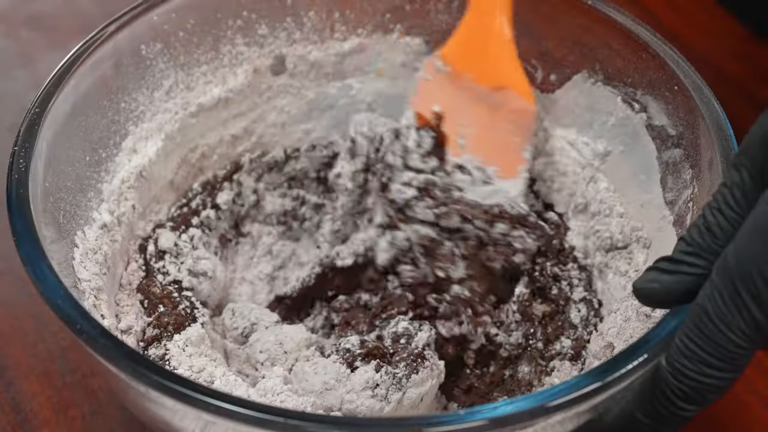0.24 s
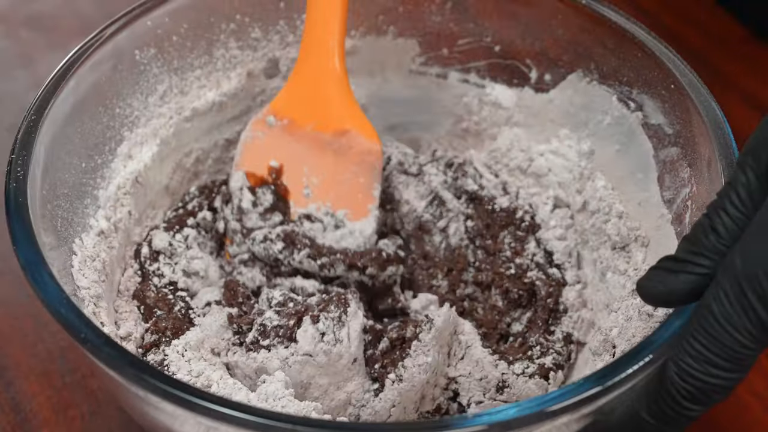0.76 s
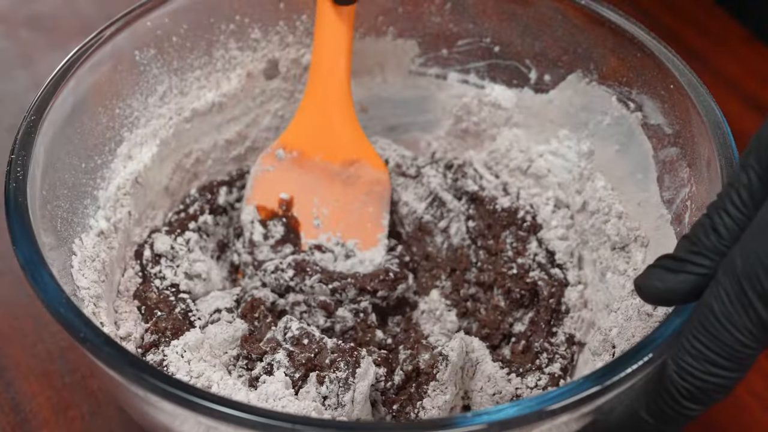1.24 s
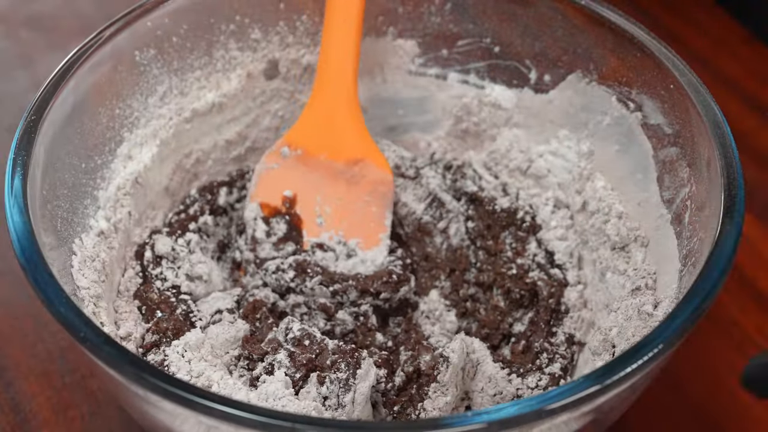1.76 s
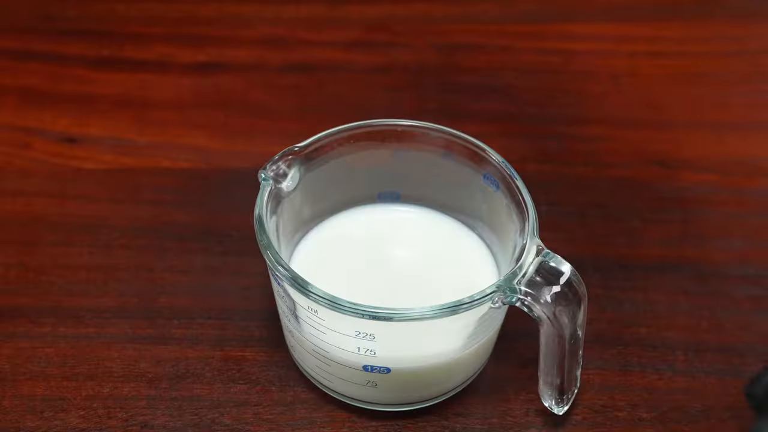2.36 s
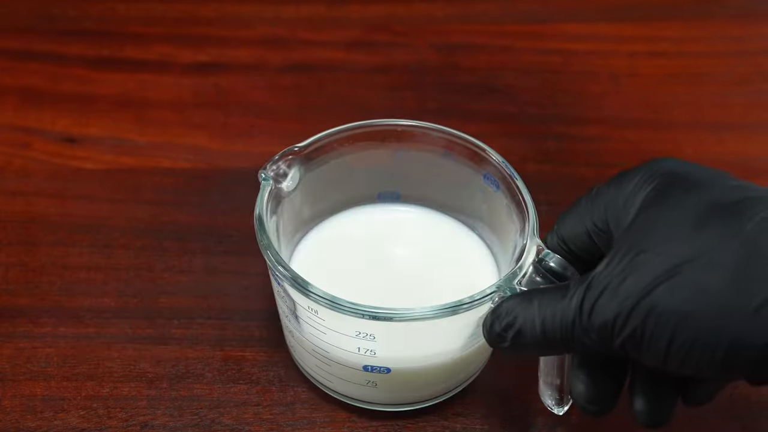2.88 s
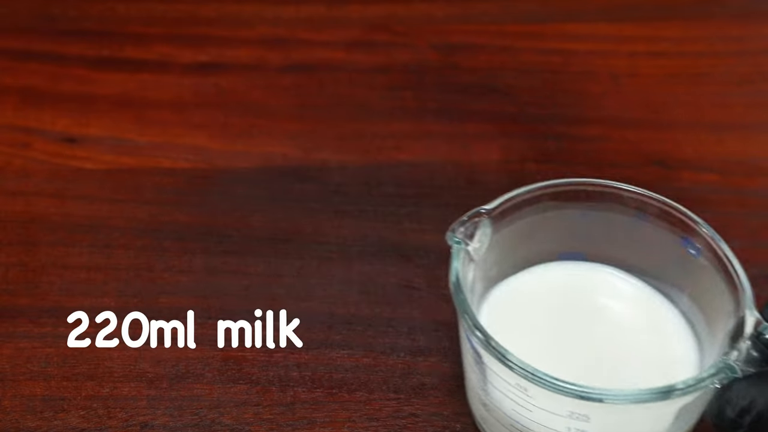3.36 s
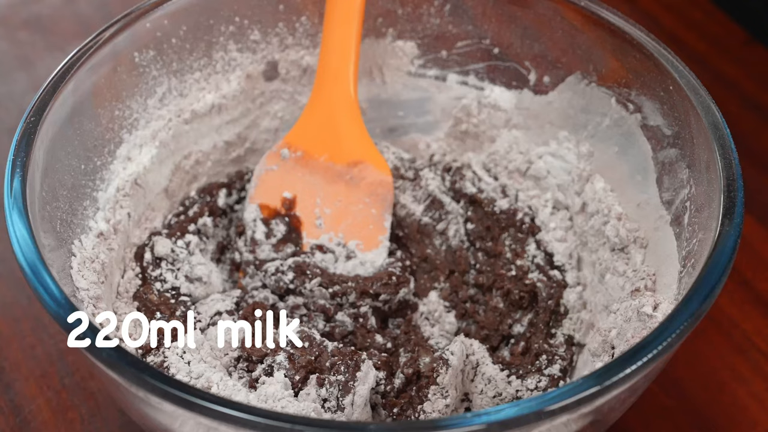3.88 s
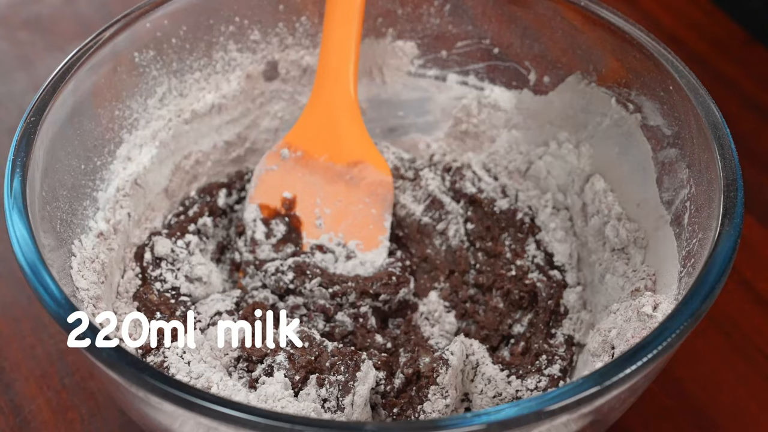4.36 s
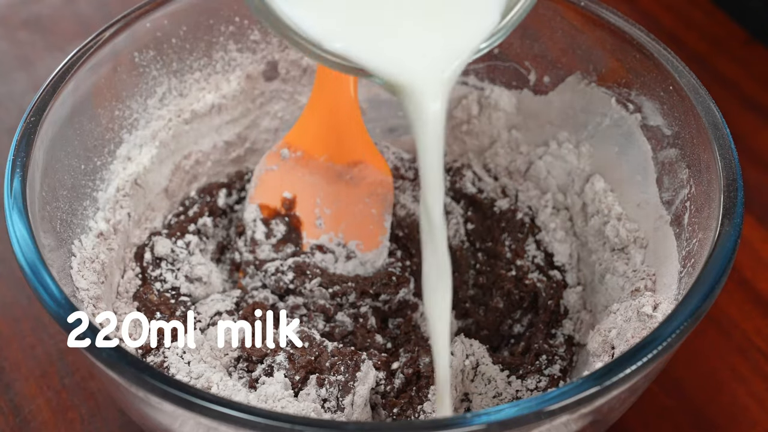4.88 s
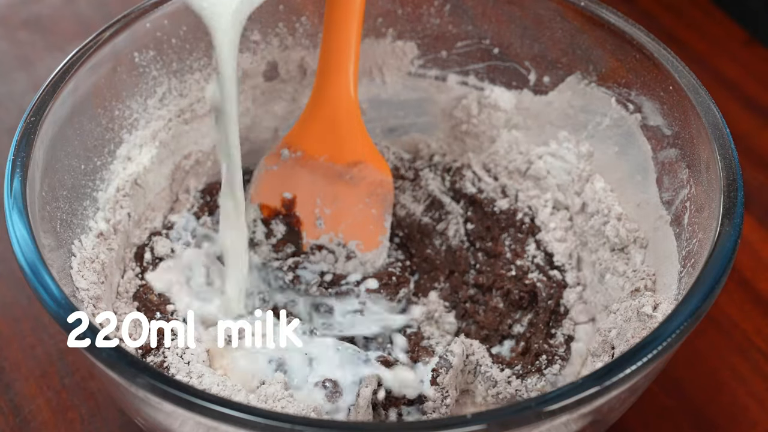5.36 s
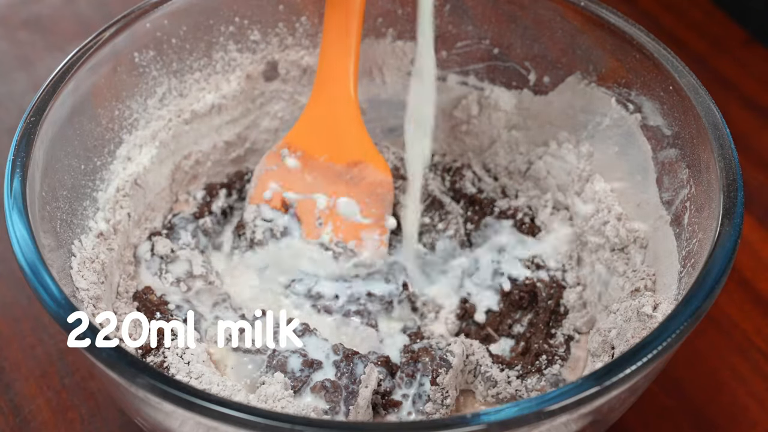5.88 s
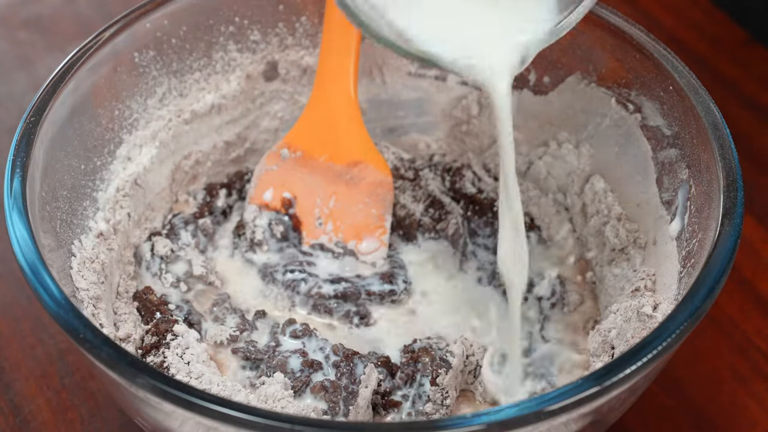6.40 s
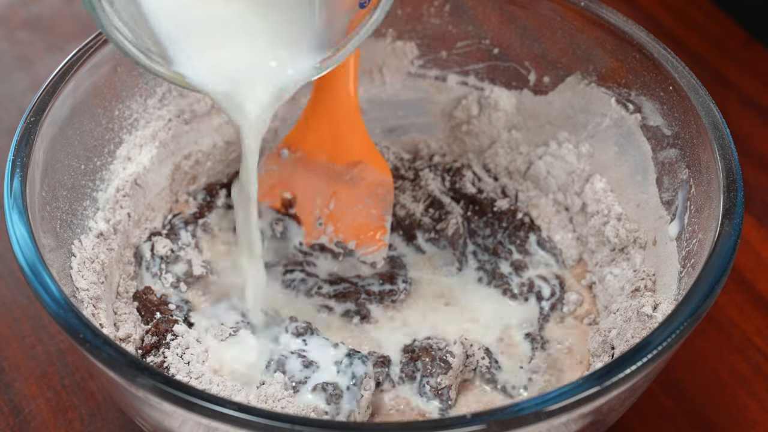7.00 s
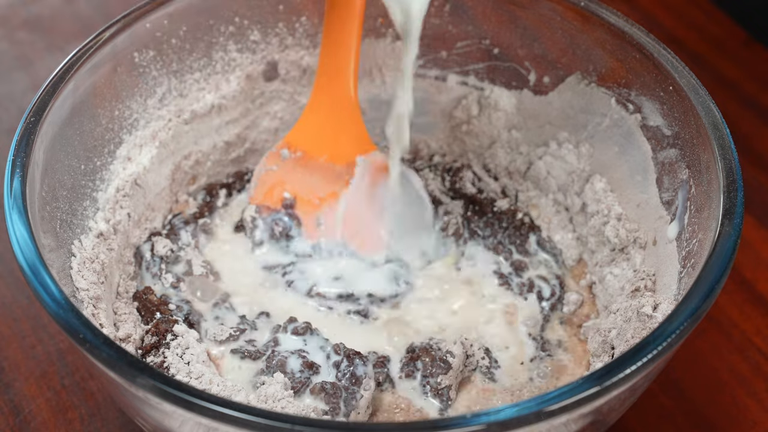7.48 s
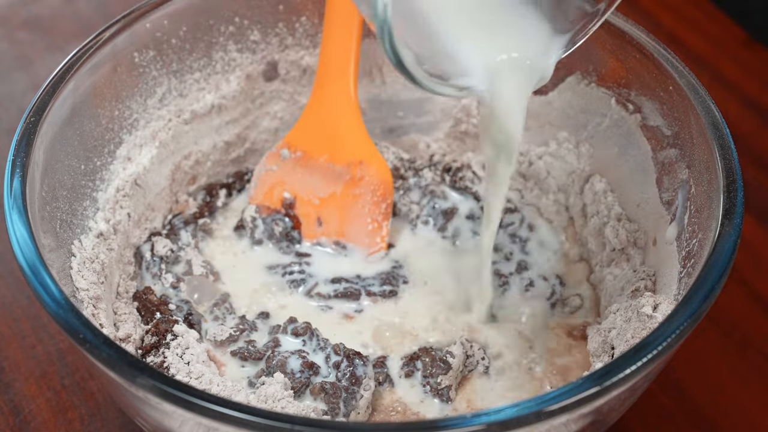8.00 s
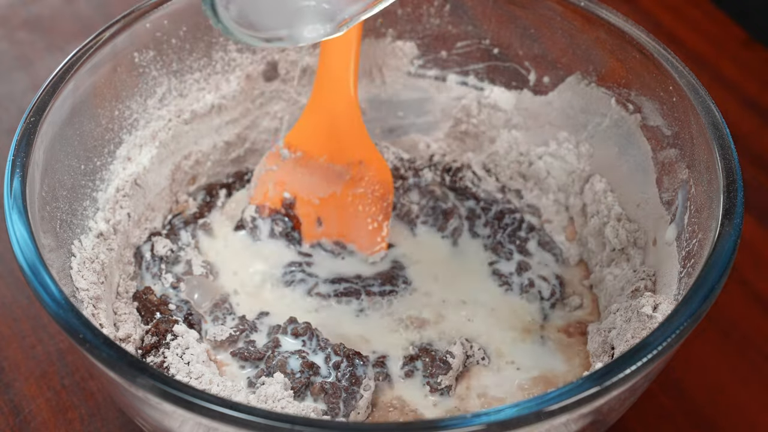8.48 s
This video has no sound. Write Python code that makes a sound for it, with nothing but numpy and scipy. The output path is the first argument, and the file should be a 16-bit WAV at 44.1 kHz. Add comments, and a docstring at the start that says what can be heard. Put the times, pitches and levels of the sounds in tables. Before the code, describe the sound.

A close microphone in a small kitchen picks up low room rumble, slight hiss and a faint unsteady appliance hum throughout. From 0 to about 0.9 seconds, a silicone spatula rubs and crunches through dry flour and sticky cocoa batter, with a few tiny ticks. A soft deep thud comes near 1.4, then a sharp click with a brief glassy ring from the bowl at 1.5. Lighter rubbing and rustling fade by 2.9, with a knock at 2.8. From 3.0 to 3.9 a glass jug scrapes over wood, rough and resonant, its low judder growing before it stops. Near quiet follows, with one faint rub at 4.1. From 4.85 milk splatters onto the batter: soft pats, fizz and a short gurgle around 5.6, then denser crackling bubbles and bright pops. A soft low boom passes near 6.9. Pops cluster at 8.0 to 8.4 with dull knocks, then the splatter thins out.

```python
"""Cocoa batter, a dragged jug and splattering milk

A silicone spatula rubs and crunches flour into cocoa batter, and clicks and rings its glass bowl.
A glass jug scrapes over a wooden table: random slips shake the ringing modes of table and jug.
Its milk then splatters onto the batter: uneven ticks and small bubbles, with air pockets popping as
short ringing tones. Dull knocks, low rumbles and a faint appliance hum complete the small kitchen."""
import sys
import numpy as np
from scipy import signal
from scipy.fft import rfft, irfft, next_fast_len
from scipy.io import wavfile
from scipy.ndimage import map_coordinates

SR = 44100
rng = np.random.default_rng(int(sys.argv[2]) if len(sys.argv) > 2 else 0)


def transcribe(u):
    """Save the signal u as a 16-bit wav file named by the first command-line argument.

    u: samples, shape (n,) or (channels, n), limited to [-1, 1]; the rate is SR.
    q: integer samples, one column per channel.
    """
    v = np.clip(np.atleast_2d(u).T, -1, 1)
    q = np.round(v * 32767).astype(np.int16)
    wavfile.write(sys.argv[1], SR, q)


N = 385434
TOP_HZ = 16000  # nothing sounds above this
T = np.arange(N) / SR  # time in seconds
BRIEF = T[:1024]  # time axis for very short sounds, in seconds


def amp(db):
    """Decibels to gain."""
    return 10 ** (np.asarray(db) / 20)


def unit(x):
    """Scale to rms 1."""
    return x / np.sqrt(np.mean(x ** 2) + 1e-20)


def along(points, hz):
    """Read values between (Hz, value) points on a log frequency axis."""
    f, v = np.transpose(points)
    return np.interp(np.log(hz + 1), np.log(f + 1), v)


def levels(rows):
    """One gain per sample for each dB column, silent outside the rows."""
    s, *columns = np.transpose(rows)
    inside = (T >= s[0]) * (T <= s[-1])
    return [amp(np.interp(T, s, column)) * inside for column in columns]


def wobble(rate):
    """A smooth random curve with this many random knots a second."""
    knots = rng.standard_normal(int(N * rate / SR) + 4)
    return map_coordinates(knots, [T * rate])


def swell(start, hold, attack, release):
    """A gain that rises up to the start, holds, then dies away; all in seconds."""
    before = np.minimum(T - start, 0)
    after = np.maximum(T - start - hold, 0)
    return np.exp(before / attack - after / release)


def filtered(x, response):
    """Multiply the spectrum of x by a response that depends on frequency."""
    m = next_fast_len(N + SR // 4)
    return irfft(rfft(x, m) * response(np.fft.rfftfreq(m, 1 / SR)), m)[:N]


def coloured(x, spectrum):
    """Shape x with (Hz, dB) points, at rms 1."""
    return unit(filtered(x, lambda hz: amp(along(spectrum, hz))))


def band(x, lo_hz, hi_hz, order=2):
    """Keep the band between two frequencies, with a causal filter."""
    edges = np.clip([lo_hz, hi_hz], 1, SR / 2 - 1)
    return signal.lfilter(*signal.butter(order, edges, "band", fs=SR), x)


def add(out, s, x):
    """Mix x into out at time s in seconds."""
    part = out[max(round(s * SR), 0):][:len(x)]
    part += x[:len(part)]


def ticks(rate, spread_db):
    """Randomly timed impulses of uneven size and sign, rate a second, at rms 1."""
    at, size, sign = rng.random((int(rate * N / SR), 3)).T
    impulses = amp(spread_db * size ** 2) * np.sign(sign - .5)
    return unit(np.bincount((at * N).astype(int), impulses, N))


def ringing(turns, cycles, rise):
    """An air pocket swells within a cycle, dies in a few and climbs in pitch if rise is above 0."""
    age = turns / cycles
    envelope = np.exp(-age) * (1 - np.exp(-(turns / 0.69) ** 2))
    return envelope * np.sin(2 * np.pi * turns * (1 + rise * np.tanh(age / 2)))


def bubbles(rate, centre_hz, octaves, cycles, spread_db, rise, size=400):
    """Random small bubbles of uneven size, pitch and life, rate a second, at rms 1."""
    at, strength, a, b, life = rng.random((int(rate * N / SR), 5)).T[..., None]
    hz = np.minimum(centre_hz * 2 ** (octaves * (a - b)), TOP_HZ)
    ring = ringing(hz * np.arange(size) / SR, cycles * (.5 + life), rise)
    grain = amp(spread_db * strength ** 2) * ring
    where = (at * N).astype(int) + np.arange(size)
    return unit(np.bincount(where.ravel(), grain.ravel(), N)[:N])


def burst(life, lo_hz, hi_hz):
    """A tiny puff of band-passed noise with the rms of its fade; life in seconds."""
    fade = np.exp(-BRIEF / life) * (1 - np.exp(-4 * BRIEF / life))
    puff = band(rng.standard_normal(len(BRIEF)) * fade, lo_hz, hi_hz)
    return unit(puff) * np.sqrt(np.mean(fade ** 2))


def background():
    """Room rumble and hiss from shaped noise, with slightly unsteady tones for an appliance's hum."""
    # Colour of the room noise. Each row: frequency in Hz, density in dB per Hz.
    room_colour = [(12, -44), (25, -12), (50, 1.5), (75, -3.5), (120, -6.5), (170, -14.5), (270, -15),
                   (400, -24.5), (700, -26), (1500, -30.5), (3200, -35), (8000, -37), (16000, -36.5)]
    # Tones of the hum. Each row: frequency in Hz, middle level in dB.
    hum_tones = [(48.4, -60.5), (127, -53.5), (193, -64.5), (254, -60), (382, -68.5)]
    hum = np.zeros(N)
    for hz, db in hum_tones:
        level = amp(db + 3.24 * wobble(3))
        hum += level * np.sqrt(2) * np.sin(2 * np.pi * hz * T + 0.54 * wobble(7))
    room_db = -46.5
    return hum + amp(room_db) * coloured(rng.standard_normal(N), room_colour)


def spatula():
    """The blade rubs through the batter while dry crumbs crunch and a few sticky ones tick."""
    # Strokes of the spatula, then of the gloved hand.
    # Each row: start in seconds, hold in seconds, rub level in dB, crunch level in dB, before the mix below.
    strokes = [(0, 0.18, -51, -51), (0.223, 0.5, -55, -51.5), (0.758, 0.14, -66.5, -52),
               (1.183, 0.37, -52.5, -53.5), (1.504, 0.19, -46, -52.5), (1.72, .12, -53, -59.5),
               (1.856, 0.18, -49.5, -60.5), (2.138, 0.36, -60.5, -63.5), (2.448, .015, -50, -58),
               (2.51, .26, -56, -68), (2.82, 0.083, -52, -58), (4.08, 0.15, -61, -69)]
    # Colour of the rubbing. Each row: frequency in Hz, density in dB per Hz.
    rub_colour = [(200, -6), (380, -5), (560, -2.5), (800, -2.5), (1200, -0.5), (2500, -6), (4500, -9),
                  (8000, -24)]
    # Colour of the crunching powder. Each row: frequency in Hz, density in dB per Hz.
    powder_colour = [(1470, -43), (2500, -9), (3720, -6), (4480, -2), (5560, -2.5), (9730, -1.5),
                     (14800, -5.5), (16000, -12)]
    rub, crunch = np.zeros((2, N))
    for s, length, rub_db, crunch_db in strokes:
        stroke = swell(s, length, attack=0.045, release=0.051)
        rub = np.maximum(rub, amp(rub_db) * stroke)
        crunch = np.maximum(crunch, amp(crunch_db) * stroke)
    rubbing = coloured(ticks(rate=3500, spread_db=15.5), rub_colour) * amp(2 * wobble(35))
    crumbs = coloured(ticks(rate=6000, spread_db=28), powder_colour) * amp(1.9 * wobble(44.0))
    sticky = bubbles(rate=160, centre_hz=6530, octaves=0.82, cycles=2.5, spread_db=7, rise=0, size=200)
    return rub * rubbing + crunch * (amp(-0.5) * crumbs + amp(-5.5) * sticky)


def pops():
    """A film snaps, its air pocket rings for a few cycles, neighbours burst and the batter pats softly."""
    # The loudest air pockets popping in the wet mixture.
    # Each row: time in seconds, ring strength in dB, pocket pitch in Hz, soft pat strength in dB.
    pockets = [(0.403, -20, 9600, -50), (.55, -30.5, 5500, -52), (0.9865, -29.5, 6500, -58),
               (4.871, -20.5, 12900, -27), (5.106, -19, 10530, -32), (5.2675, -18, 10920, -38),
               (5.3607, -14.5, 3030, -27), (5.421, -29, 1910, -27), (5.487, -18.5, 4730, -38),
               (5.564, -18.5, 1900, -31), (5.577, -11.5, 9130, -37), (5.6627, -14, 3500, -26),
               (5.6666, -6.5, 5800, -22.5), (5.776, -22.5, 1990, -43), (5.793, -19.5, 2580, -36),
               (5.8802, -16, 10700, -42), (5.9456, -11.5, 6200, -33), (5.9947, -23.5, 3520, -46),
               (6.0484, -16, 6030, -37), (6.121, -20, 5400, -48), (6.2357, -11.5, 6400, -27),
               (6.342, -10.5, 13200, -46), (6.363, -5.5, 4750, -44), (6.394, -11, 6400, -41),
               (6.4236, -14, 4520, -42), (6.524, -19, 7850, -47), (6.566, -9.5, 4870, -31),
               (6.5991, -10.5, 4870, -22), (6.6075, -13, 7660, -24.5), (6.66, -19.5, 4800, -23),
               (6.703, -11, 12800, -30), (6.7183, -10.5, 9090, -41), (6.7443, -16.5, 2930, -31),
               (6.7856, -25, 6200, -47), (6.8239, -18.5, 9000, -45), (6.923, -12.5, 9780, -43),
               (7.013, -12, 14000, -43), (7.0314, -24, 3050, -45), (7.051, -12, 4030, -49),
               (7.1187, -18.5, 3450, -40), (7.1386, -15, 7300, -45), (7.146, -7.5, 7350, -42),
               (7.1586, -12, 7210, -32), (7.198, -14, 7100, -36), (7.2333, -16, 7900, -19.5),
               (7.2694, -12, 10200, -23), (7.3146, -10, 6570, -46), (7.3263, -14, 7700, -47),
               (7.352, -18, 4720, -50), (7.4456, -13.5, 7100, -40), (7.507, -10, 8950, -41),
               (7.511, -23.5, 2800, -31.5), (7.5579, -14.5, 6200, -27), (7.653, -12, 4740, -34),
               (7.6937, -18, 5630, -36), (7.758, -16.5, 5900, -51), (7.7815, -15.5, 7760, -44),
               (7.7882, -12.5, 6200, -27.5), (7.9747, -16, 6200, -56), (8.007, -14.5, 7150, -52),
               (8.0439, -20.5, 1910, -21.5), (8.0522, -17, 2200, -33), (8.0682, -9.5, 4480, -33),
               (8.0872, -12, 11760, -26), (8.1021, -7, 7340, -18.5), (8.1075, -11, 9100, -26),
               (8.1513, -7, 6900, -24), (8.1826, -9.5, 13000, -28), (8.2163, -21.5, 2180, -46),
               (8.225, -11.5, 9450, -27), (8.2421, -11, 6000, -23), (8.2607, -7, 3730, -34),
               (8.2706, -17, 6860, -44), (8.2792, -7, 7460, -46), (8.2928, -9.5, 9550, -45),
               (8.3454, -18.5, 1650, -16.5), (8.361, -19.5, 2150, -34.5), (8.429, -16.5, 7000, -46),
               (8.4969, -13, 4800, -32), (8.597, -18, 6100, -37)]
    crack_db, snap_db = -10.5, -3  # the film's crack and its bright snap, relative to the ring
    neighbour_db, neighbour_s, neighbour_octaves = -16, 0.0067, 0.34  # level, scatter in time and pitch
    out = np.zeros(N)
    for s, db, hz, pat_db in pockets:
        # lower pockets ring for more cycles; one at 6000 Hz rings for 4.44
        cycles = 4.44 * (6000 / hz) ** 0.12
        add(out, s, amp(db) * ringing(hz * BRIEF, cycles, rise=0.015))
        add(out, s, amp(db + crack_db) * burst(life=0.00069, lo_hz=2300, hi_hz=9300))
        add(out, s, amp(db + snap_db) * burst(life=0.00021, lo_hz=6940, hi_hz=15700))
        add(out, s, amp(pat_db) * burst(life=0.001, lo_hz=530, hi_hz=1700))
        for when, pitch in rng.standard_normal(size=(3, 2)):
            near_hz = min(hz * 2 ** (neighbour_octaves * pitch), TOP_HZ)
            neighbour = ringing(near_hz * BRIEF, cycles=3.3, rise=0.044)
            add(out, s + neighbour_s * when, amp(db + neighbour_db) * neighbour)
    return out


def knocks():
    """Damped contacts: a couple of low cycles with a brighter edge, and hardly any bass."""
    # Dull knocks, as the spatula bumps, the jug rocks and gobs of milk land.
    # Each row: time in seconds, body strength in dB, pitch in Hz, edge strength in dB.
    contacts = [(.47, -36, 710, -43), (2.801, -16.5, 900, -15), (4.848, -24.5, 900, -24),
                (7.218, -21, 1145, -22), (8.044, -30, 794, -19), (8.087, -16, 746, -38),
                (8.152, -28, 480, -43), (8.3457, -18, 970, -22)]
    out = np.zeros(N)
    for s, db, hz, edge_db in contacts:
        body = np.sin(2 * np.pi * hz * BRIEF) * np.exp(-BRIEF / 0.0023)
        edge = np.sin(2 * np.pi * 2050 * BRIEF) * np.exp(-BRIEF / 0.00074)
        add(out, s, amp(db) * body)
        add(out, s, amp(edge_db) * edge)
        add(out, s, amp(edge_db - 4.0) * burst(life=0.00065, lo_hz=1200, hi_hz=4550))
    return band(out, 470, 12000)


def rumbles():
    """A deep thud as the hand shifts the bowl, and later a soft boom on one low note with an overtone."""
    from_thud = T - 1.365  # seconds from the middle of the thud
    thud = amp(-30.5) * np.exp(-(from_thud / 0.026) ** 2) * np.cos(2 * np.pi * 36 * from_thud)

    def tone(hz):
        """A steady tone with a slightly wandering phase."""
        return np.sqrt(2) * np.sin(2 * np.pi * hz * T + 0.51 * wobble(20))

    boom = amp(-32) * swell(start=6.855, hold=0.06, attack=0.026, release=0.07)
    return thud + boom * (tone(122.6) + amp(-17) * tone(192.8))


def taps():
    """Each touch of the spatula clicks and briefly rings the loaded bowl's modes."""
    # Spatula against the bowl. Each row: time in seconds, click strength in dB, ring strength in dB.
    touches = [(1.505, -17.5, -55), (1.5128, -27, -39), (1.5483, -27, -63)]
    # The bowl's modes. Each row: pitch in Hz, middle strength in dB, time to fade by 60 dB in seconds.
    bowl_modes = [(2290, -7, 0.12), (3400, 0, 0.16), (8400, -8, .09), (10400, -5, 0.071)]
    out, t = np.zeros(N), T[:SR // 4]
    for s, click_db, ring_db in touches:
        ring = np.zeros(len(t))
        for hz, db, t60 in bowl_modes:
            # every touch excites the modes a little differently
            ring += amp(db + rng.normal(0, 1) - 60 * t / t60) * np.sin(2 * np.pi * hz * t)
        add(out, s, amp(ring_db) * ring)
        add(out, s, amp(click_db) * burst(life=0.00091, lo_hz=2970, hi_hz=6360))
        add(out, s, amp(click_db - 18) * burst(life=.0016, lo_hz=700, hi_hz=2600))
    return out


def jug():
    """The base slips over the wood in random jerks that shake table and jug; the low judder grows."""
    # The scrape swells unevenly, dips midway, peaks near the end, then stops.
    # Each row: time in seconds, sliding strength in dB.
    sliding = [(2.97, -60), (3.008, -42.5), (3.18, -36), (3.29, -35), (3.35, -30.5), (3.45, -30),
               (3.51, -32), (3.65, -33), (3.76, -28.5), (3.87, -34), (3.9, -57)]
    # The base catches on the wood. Each row: time in seconds, boost in dB, length in seconds.
    catches = [(3.332, 6, 0.012), (3.553, 9, .013), (3.627, 5.5, 0.014), (3.752, 3.5, 0.019)]
    # Resonances of table and jug. Each row: pitch in Hz, width in Hz, boost in dB above the rest.
    drag_modes = [(276, 32, 6.5), (444, 16, 6), (510, 14, 7), (544, 9, 11.5), (628, 12, 10), (894, 20, 4),
                  (1019, 38, 9), (1124, 35, 8), (1320, 14, 7.5), (1547, 15, 11), (2000, 17, 9.5),
                  (2253, 34, 10), (2925, 69, 9), (3750, 140, 7.5), (4486, 81, 12), (5400, 50, 10),
                  (7100, 46, 7), (8020, 50, 8.5), (8800, 120, 4)]
    # Overall colour of the scrape. Each row: frequency in Hz, density in dB per Hz.
    table_colour = [(35, -43), (75, -9), (200, -7), (255, -4.5), (315, -2), (370, -13), (450, -4),
                    (650, -4), (800, -3.5), (1150, -14.5), (1750, -27), (4000, -36.5), (6000, -39),
                    (15000, -49.5)]
    slide, = levels(sliding)
    start, end = sliding[0][0], sliding[-1][0]
    # judder against the middle of the scrape: -8.5 dB at first, growing by 16 dB a second
    judder = amp(-8.5 + 16 * (np.clip(T, start, end) - start))
    grit = amp(-3.5)

    def modes(f):
        """A flat response with a peak at each resonance."""
        response = 1
        for hz, width, db in drag_modes:
            response = response + (amp(db) - 1) * 1j * f * width / (hz * hz - f * f + 1j * f * width)
        return response

    slips = ticks(rate=3500, spread_db=4) * amp(1.2 * wobble(70))
    body = coloured(filtered(slips, modes), table_colour)

    def below(edge_hz):
        """The part of the scrape below a soft edge."""
        return filtered(body, lambda hz: 1 / (1 + (hz / edge_hz) ** 8))

    low, low_and_middle = below(edge_hz=430), below(edge_hz=1420)
    middle, high = unit(low_and_middle - low), unit(body - low_and_middle)
    catch = amp(sum(db * np.exp(-((T - s) / length) ** 2) for s, db, length in catches))
    return slide * (catch * (judder * unit(low) + middle) + grit * high)


def stream():
    """Milk lands in uneven gobs: flow drives a soft splash and puddle bubbles, under a crackling spray."""
    # The wandering stream of milk. Each row: time in seconds, how hard it hits the batter in dB,
    # level of its crackling treble in dB, before the random swing of the gobs.
    flow_levels = [(4.8, -81, -82), (4.87, -55, -56), (5.03, -56.5, -62), (5.1, -48.5, -46),
                   (5.17, -49.5, -50), (5.25, -51, -36), (5.33, -51.5, -46), (5.49, -51.5, -39),
                   (5.57, -46, -39), (5.79, -46.5, -41.5), (5.84, -60.5, -44.5), (5.98, -52.5, -47.5),
                   (6.05, -52.5, -38), (6.14, -55.5, -45.5), (6.29, -56, -42), (6.38, -48, -35),
                   (6.47, -52, -37.5), (6.54, -55.5, -40.5), (6.7, -48.5, -41.5), (6.8, -47, -42),
                   (6.86, -62, -49.5), (6.98, -57.5, -43.5), (7.05, -51.5, -38), (7.25, -47.5, -39),
                   (7.34, -56.5, -38), (7.44, -68, -49), (7.6, -60, -39.5), (7.88, -57, -42.5),
                   (8.0, -67, -42.5), (8.06, -49, -39.5), (8.2, -49, -42.5), (8.29, -50, -38),
                   (8.37, -54, -45), (8.43, -63, -51), (8.52, -62, -42.5), (8.74, -79, -49)]
    # Milk soaking in. Each row: time in seconds, share of the spray's power that is single bubbles.
    soaking = [(5.0, 0.46), (5.9, 0.88)]
    # Colour of the soft splash. Each row: frequency in Hz, density in dB per Hz.
    splash_colour = [(250, -13), (420, -12), (560, 1), (750, 4), (1000, -6.5), (1450, -1), (1900, -22),
                     (3000, -16)]
    # Colour of the even fizz. Each row: frequency in Hz, density in dB per Hz.
    spray_colour = [(1760, -54), (3000, -4.5), (4260, -6), (4760, 5.5), (5370, 0), (7400, 2), (8700, 0),
                    (14300, -2.5), (16000, -15)]
    impact, spray = levels(flow_levels)
    flow = impact / amp(-49.5)  # 1 at a medium flow
    splash = amp(-52) * flow
    bubbling = amp(-48) * flow ** 1.55  # grows 1.55 dB per dB of flow
    gobs = amp(3.68 * wobble(60))
    pats = coloured(ticks(rate=2000, spread_db=20.5), splash_colour)
    puddle = bubbles(rate=1900, centre_hz=2558, octaves=0.83, cycles=3.2, spread_db=27, rise=0.073)
    beads = bubbles(rate=900, centre_hz=6470, octaves=0.93, cycles=2.8, spread_db=33, rise=0.033)
    films = bubbles(rate=770, centre_hz=10900, octaves=0.99, cycles=2.5, spread_db=51, rise=0.047, size=120)
    fizz = coloured(ticks(rate=2500, spread_db=50), spray_colour)
    # dry powder soaks the milk up with an even fizz; single bubbles take over once a puddle stands
    wet = np.interp(T, *np.transpose(soaking))
    single_bubbles = unit(beads + amp(-1.5) * films)
    crackle = np.sqrt(wet) * single_bubbles + np.sqrt(1 - wet) * fizz
    return gobs * (splash * pats + bubbling * puddle + spray * crackle)


def hollow():
    """Splashing excites the air in the hollow: a narrow, gurgling band that moves in pitch."""
    # The hollow that the stream digs into the batter.
    # Each row: time in seconds, resonance in Hz, level in dB before a random swing.
    resonance = [(4.88, 1401, -60.5), (5.15, 1450, -55.5), (5.48, 1640, -60), (5.57, 1940, -40),
                 (5.639, 2000, -52), (5.7, 1254, -52), (5.78, 1960, -46), (5.81, 2430, -57)]
    s, hz, db = np.transpose(resonance)
    loudness, = levels(np.transpose([s, db]))
    phase = 2 * np.pi * np.cumsum(np.interp(T, s, hz)) / SR
    # two random curves on one carrier make a narrow band of noise
    gurgle = unit(wobble(460) * np.cos(phase) + wobble(460) * np.sin(phase))
    return loudness * gurgle * amp(5.2 * wobble(80))


def kitchen(x, early_db, tail_db, size=8192):
    """Quick echoes from bowl and table top, then the room's short tail, drawn afresh for each block."""
    # The room's tail. Each row: frequency in Hz, time to fade by 60 dB in seconds.
    fade_times = [(200, 1), (2000, 0.15), (12000, 0.029)]
    out, lag = x.copy(), T[:SR // 4]
    for start in range(0, N, size):
        # the tail is noise in which every frequency fades at its own speed
        hz, t, z = signal.stft(rng.standard_normal(len(lag)), SR, nperseg=256)
        fade = amp(-60 * t / along(fade_times, hz)[:, None])
        tail = signal.istft(z * fade, SR, nperseg=256)[1][:len(lag)]
        early = rng.standard_normal(len(lag)) * np.exp(-lag / 0.0025) * (lag > .001)
        answer = amp(early_db) * early / np.linalg.norm(early) + amp(tail_db) * tail / np.linalg.norm(tail)
        add(out, start / SR, signal.fftconvolve(x[start:start + size], answer))
    return out


def scene():
    """Bowl sounds are heard with the kitchen's echoes; jug, rumbles and background are added dry."""
    bowl = spatula() + taps() + knocks() + stream() + hollow() + pops()
    return (kitchen(bowl, early_db=-12, tail_db=-16.0) + jug() + rumbles() + background())[None]


def record(dry):
    """The recorder keeps nothing above its band limit."""
    return filtered(dry[0], lambda hz: hz < TOP_HZ)[None]


dry = scene()
out = record(dry)
transcribe(out)
```